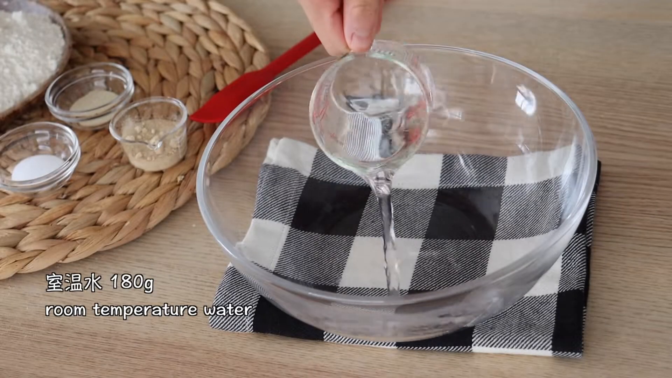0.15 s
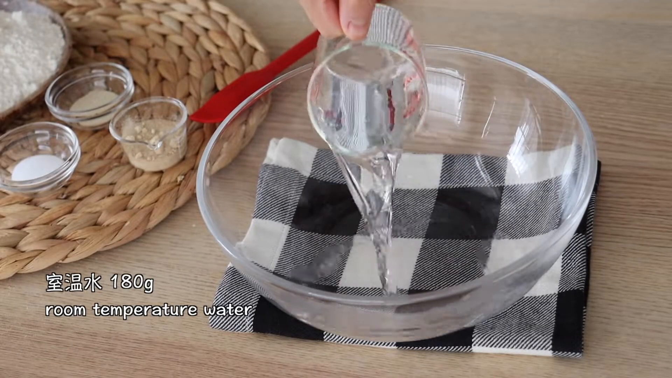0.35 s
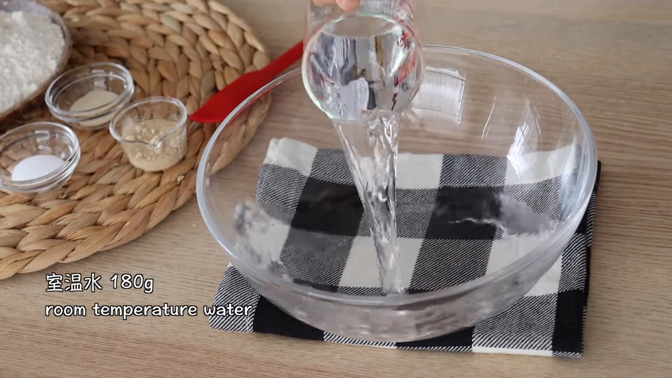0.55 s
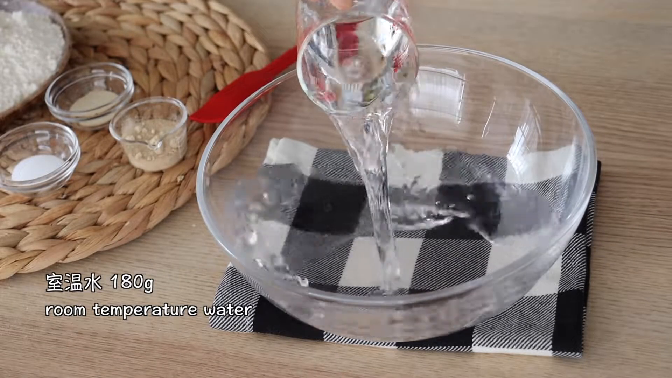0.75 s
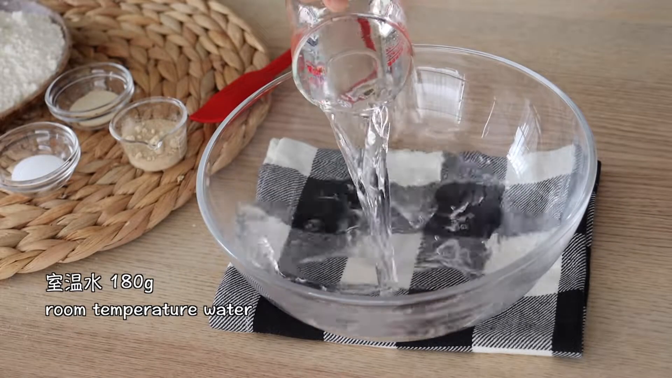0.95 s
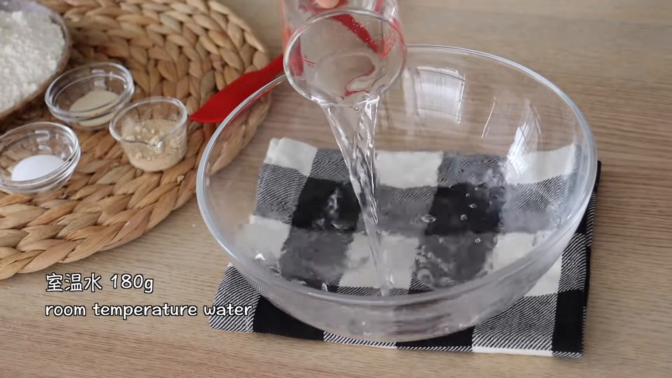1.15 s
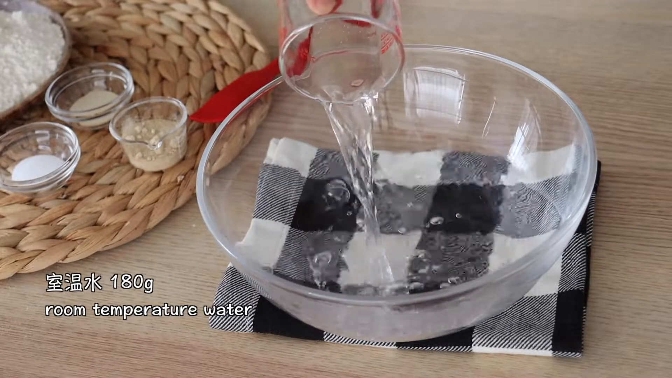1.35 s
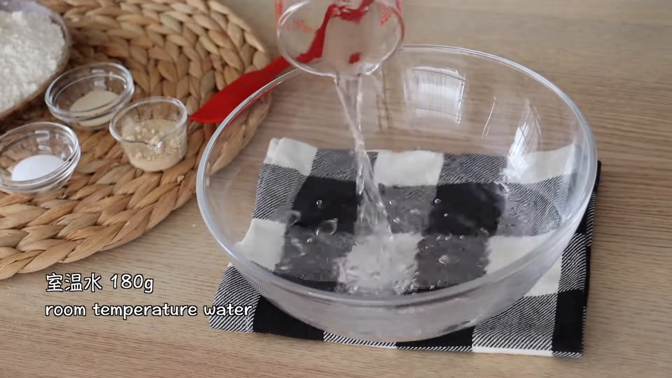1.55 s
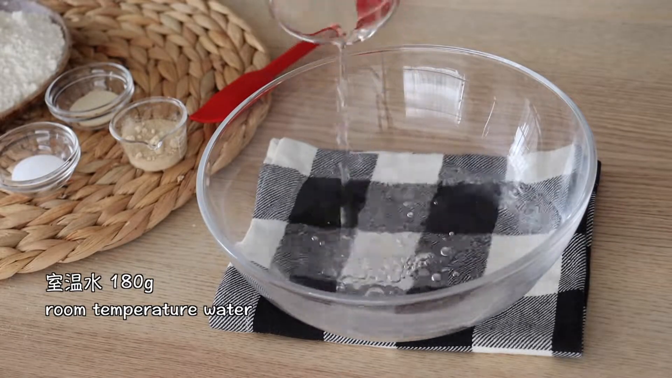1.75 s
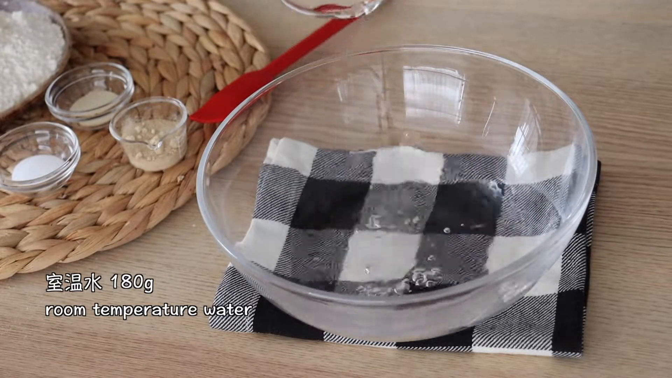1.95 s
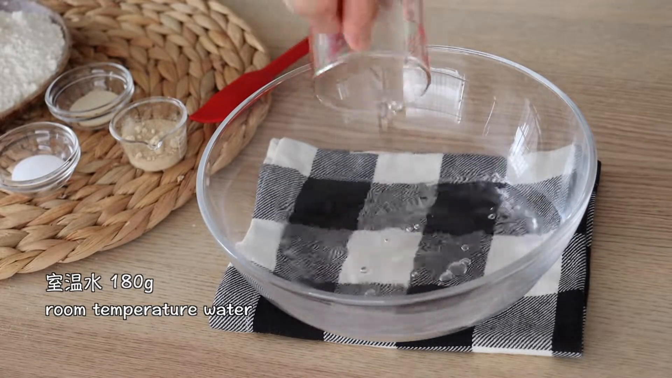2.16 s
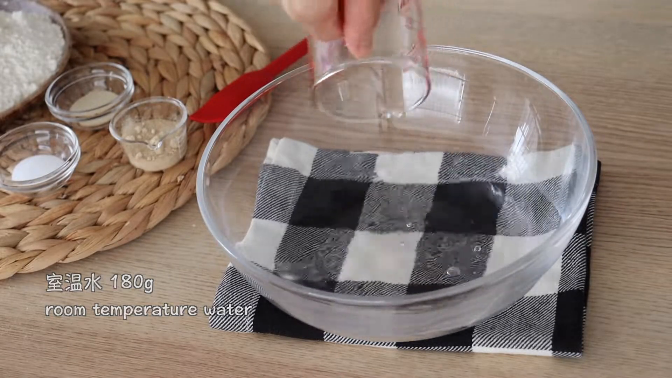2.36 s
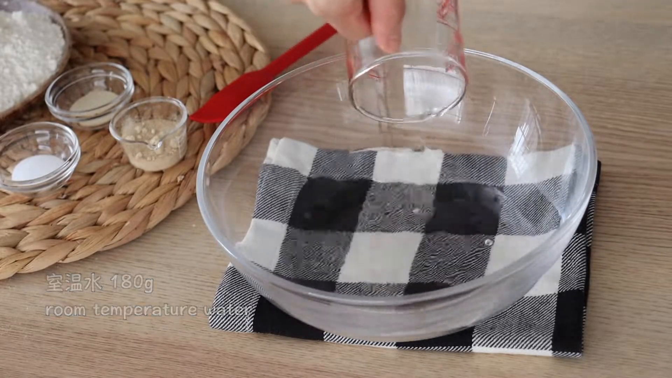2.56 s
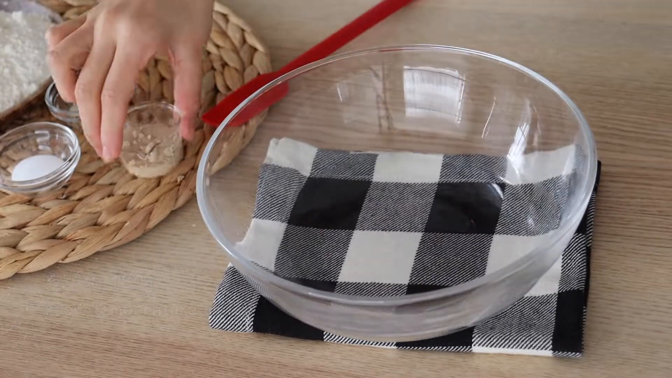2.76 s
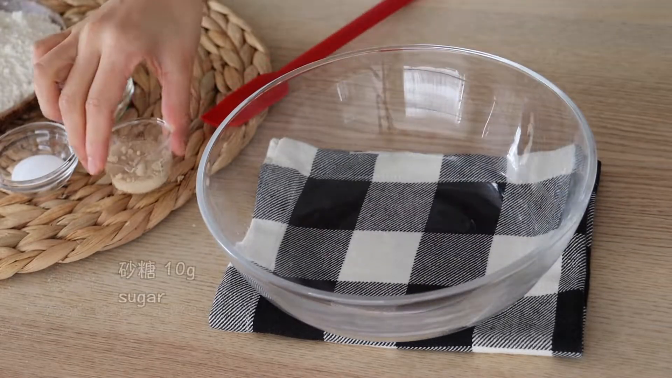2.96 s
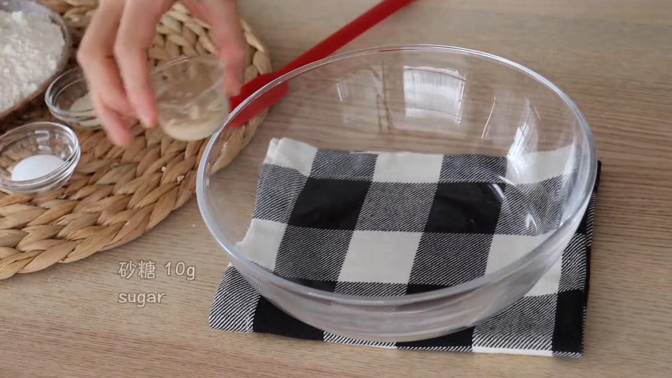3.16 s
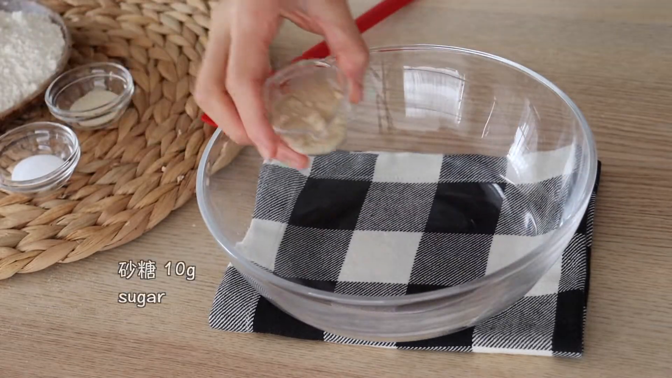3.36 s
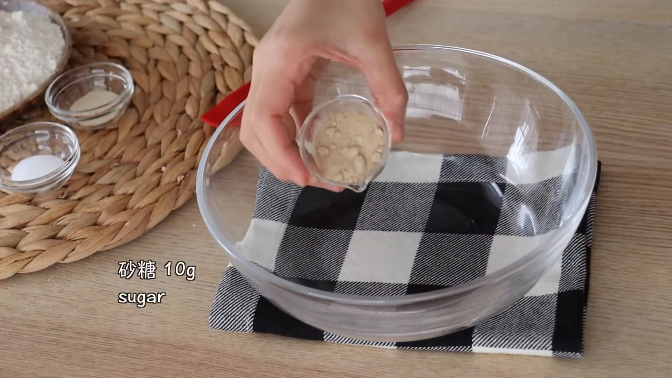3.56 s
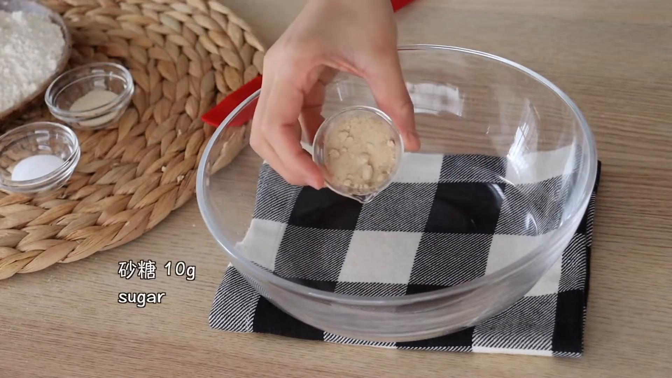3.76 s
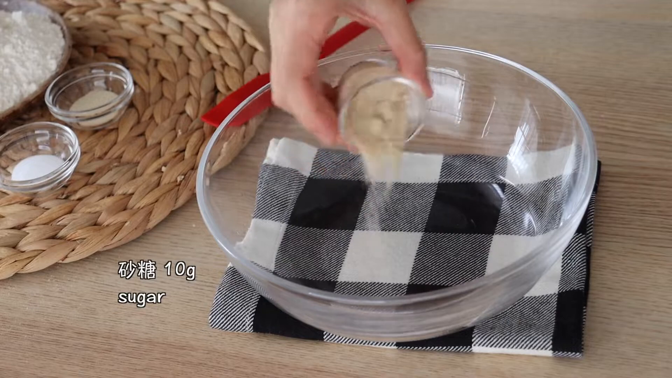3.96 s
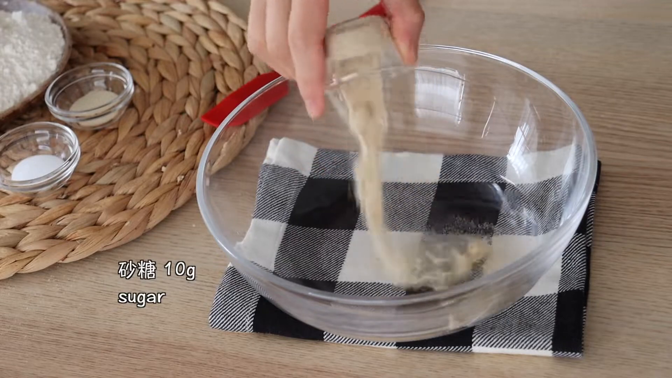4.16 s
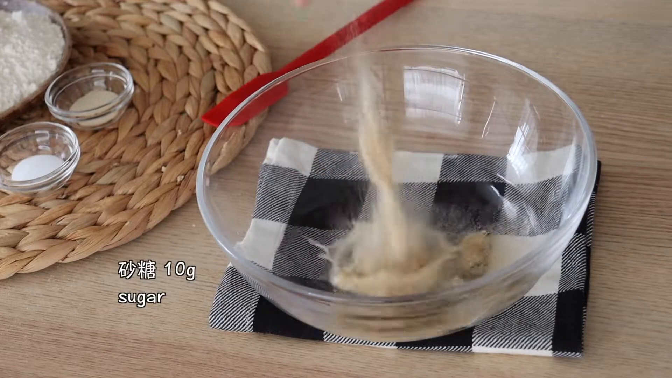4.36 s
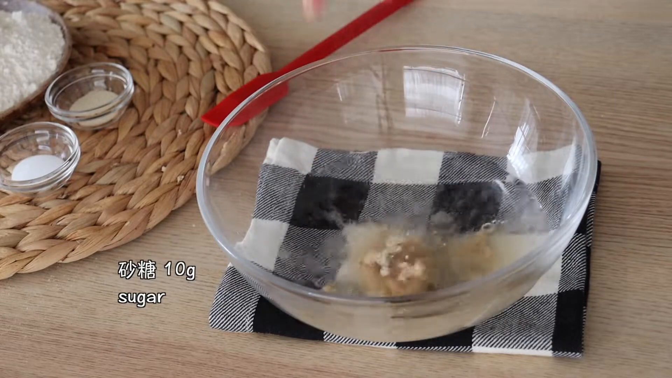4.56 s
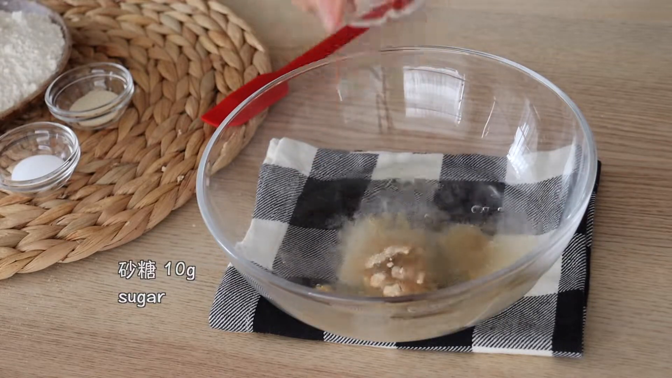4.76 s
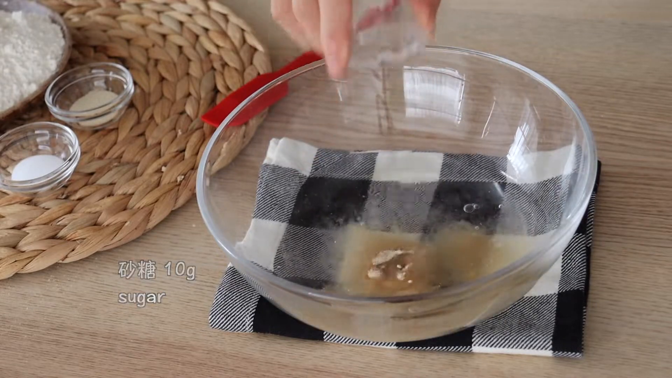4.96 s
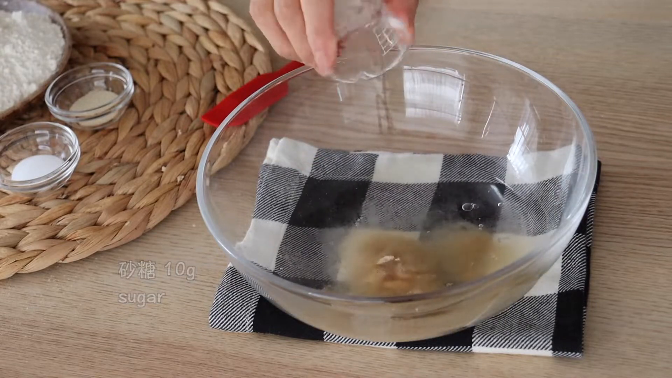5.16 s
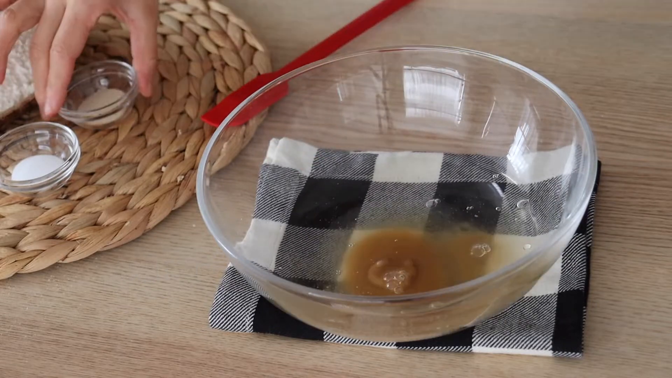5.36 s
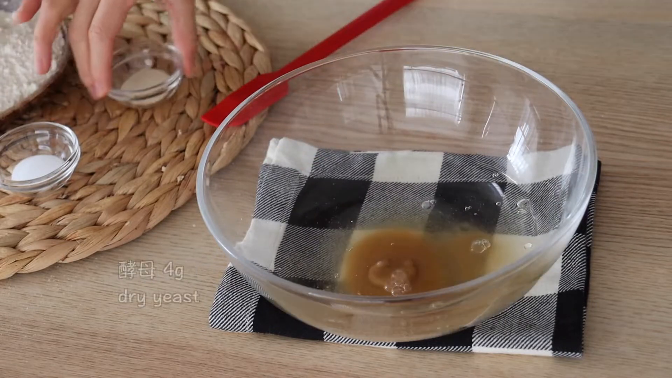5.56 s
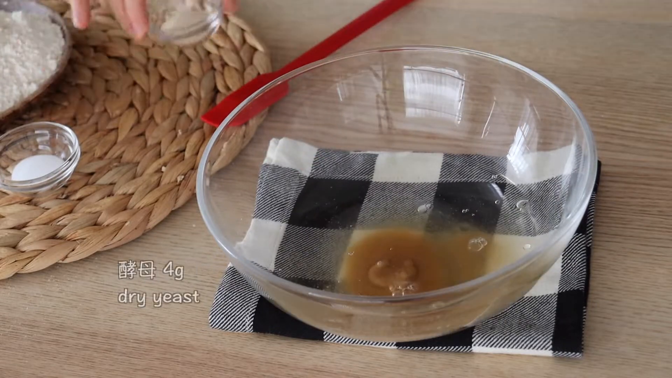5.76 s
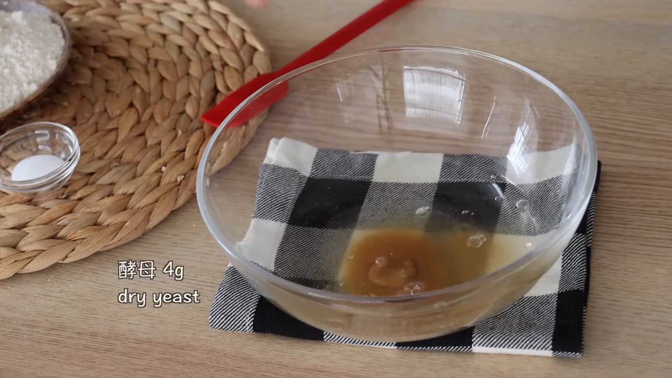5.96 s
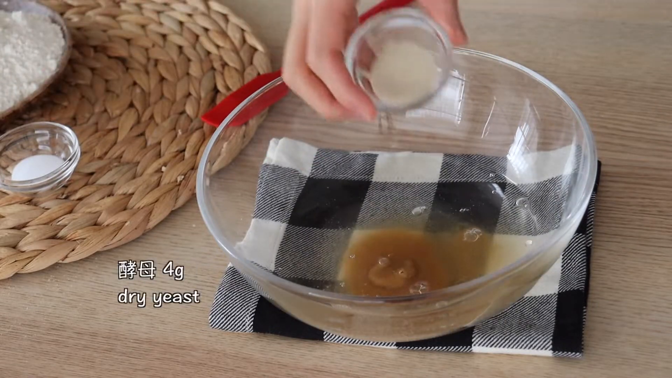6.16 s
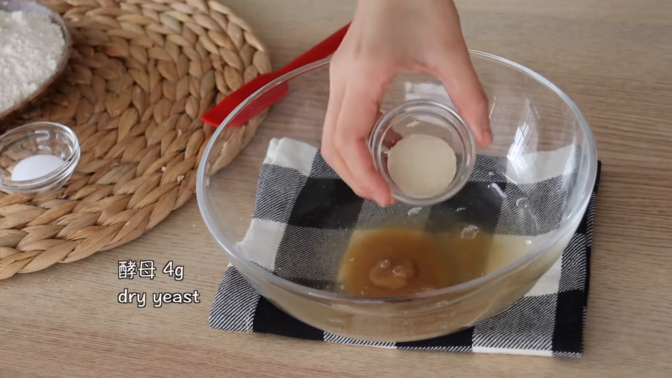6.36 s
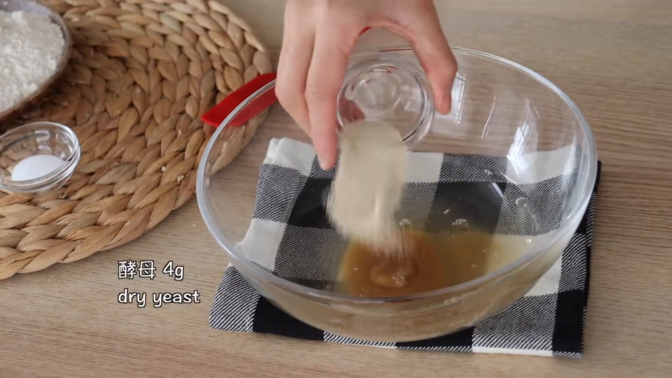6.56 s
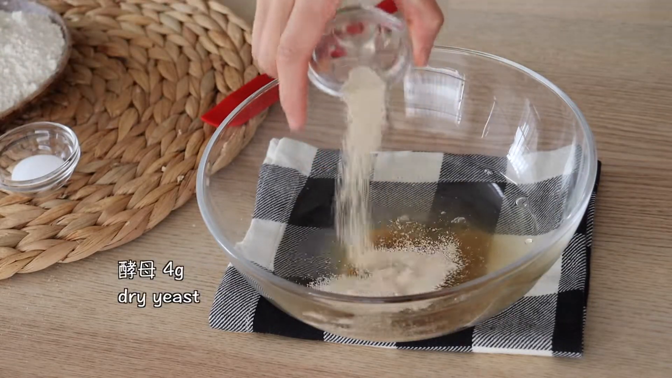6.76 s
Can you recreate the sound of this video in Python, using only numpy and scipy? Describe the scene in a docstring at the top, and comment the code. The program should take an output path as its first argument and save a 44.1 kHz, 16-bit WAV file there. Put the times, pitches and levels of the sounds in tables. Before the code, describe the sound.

In a quiet kitchen, close to the microphone and toward the left, water trickles, babbles and splashes into a glass bowl, finishing with drips and a light clink. Much softer sounds follow over a faint hum: a dish scraping on woven straw, fingers rubbing it, lumps of sugar slapping the water and dull table bumps. After a second scrape comes a tiny, hissing rush of dry yeast.

```python
"""Water pours from a cup into a wide glass bowl on a kitchen table. Trapped air rings as single plinks,
thickens to a babble with gulps and ends in drips. A small dish scuffs over a straw mat by stick-slip
friction, and a low hum joins the room noise. Lumps of sugar slap the water and the glass rings faintly;
the dish scuffs again, and last a rush of dry yeast patters in. Throughout, everything is close to the
left microphone, while the right one hears mostly the small room."""
import sys
import numpy as np
from scipy import signal
from scipy.fft import rfft, irfft
from scipy.io import wavfile

SR = 44100
rng = np.random.default_rng(int(sys.argv[2]) if len(sys.argv) > 2 else 0)


def unload_audio(sound):
    """Save the sound as a 16-bit wav file, at the path given as the first command line argument."""
    columns = np.transpose(np.atleast_2d(sound))
    # keep every value between -1 and 1, then stretch to whole-number steps
    steps = np.round(np.clip(columns, -1, 1) * 32767)
    wavfile.write(sys.argv[1], SR, steps.astype(np.int16))


N = 300321
TIME = np.arange(N) / SR
TOP_HZ = 16100


def bubble(hz, life_ms, rise, onset_cycles=0.13, swell=2.4, steady_hz=5500):
    """Minnaert resonance: trapped air pulsates, higher and louder as it nears the surface, then bursts."""
    life_samples = life_ms * SR / 1000
    age = np.arange(int(3 * life_samples) + 2) / life_samples
    rise = rise / (1 + (hz / steady_hz) ** 4)  # the tiniest bubbles hardly float up while they ring
    cycles = np.cumsum(hz * 2 ** (rise * np.minimum(age, 1) ** 2)) / SR
    onset = 1 - np.exp(-cycles / onset_cycles)
    loudness = onset * np.exp(swell * rise * (age - .5) - age ** 3)
    return np.sin(2 * np.pi * cycles) * loudness


# Bubbles that stand out singly: (time [s], pitch [Hz], level [dB], nominal rise [octaves])
PLINKS = [ (.397, 5200, -32.5, 0.22), (.415, 7900, -37, 0.58), (.451, 4700, -37, -0.048),
          (.508, 4350, -25.5, 0.0081), (.6063, 2520, -34.5, 0.41), (.611, 2260, -26.5, 0.097),
          (0.614, 7800, -33.5, 0.29), (0.658, 7600, -29, -0.033), (.7087, 1977, -19.5, 0.29),
          (.773, 10400, -36, .2), (0.783, 1057, -40, 0.1), (0.826, 4410, -15.5, -0.13),
          (.844, 1215, -15, 0.43), (0.867, 1810, -15.5, 0.27), (.885, 4480, -28, -0.11),
          (0.9125, 3060, -19, -0.096), (.921, 2940, -23.5, 0.41), (.936, 10000, -35, 0.035),
          (1.0023, 2420, -25, 0.18), (1.058, 2390, -24, -0.2), (1.076, 2450, -23, 0.35),
          (1.082, 1080, -29.5, 0.7), (1.123, 3650, -24, -0.13), (1.158, 1117, -32, 0.47),
          (1.181, 5200, -26.5, -0.14), (1.24, 4500, -30.5, 0.36), (1.275, 2240, -20.5, .07),
          (1.348, 2760, -25, 0.061), (1.361, 4030, -20.5, 0.15), (1.443, 1413, -26, -0.14),
          (1.509, 1597, -16, 0.39), (1.517, 1477, -16.5, 0.00081), (1.523, 1275, -17, 0.092),
          (1.54, 1603, -12.5, 0.063), (1.544, 1934, -21, 0.55), (1.5711, 1415, -13, -0.27),
          (1.593, 1152, -15.5, -0.088), (1.6135, 1071, -15, 0.25), (1.632, 2060, -20.5, 0.2),
          (1.676, 2310, -18.5, 0.11), (1.773, 1510, -21.5, 0), (1.773, 2020, -15.5, 0.42),
          (1.861, 1519, -11, 0.099), (1.874, 1615, -19, 0.11), (1.891, 2420, -18.5, 0),
          (1.951, 6200, -21, 0.045), (4.47, 2150, -25.5, 0.53), (4.475, 3300, -27.5, 0.42),
          (6.313, 3040, -43, 0.62)]

def plinks(ring_cycles=11.95, cycles_per_octave=13.8, tick_db=-8.5):
    """Free oscillation: a bubble pinches off with a tick, then rings, longer the further it climbs."""
    out = np.zeros(N)
    for start, hz, db, rise in PLINKS:
        life_ms = 1000 * (ring_cycles + cycles_per_octave * max(rise, 0)) / hz
        add(out, start, amp(db) * bubble(hz, life_ms, rise))
        add(out, start, amp(db + tick_db) * crack(1.75 * hz, decay_ms=0.88))
    return out


# Strength of the stream as the cup tips and empties: (time [s], level [dB])
POUR_FLOW = [(.3, -52), (.75, -27), (1.0, -13), (1.22, -12.5), (1.32, -4.5), (1.42, -3), (1.53, -6),
             (1.6, 2), (1.7, -3), (1.77, -14.5), (2.08, -28.5)]
# Spectrum of the small bubbles: (frequency [Hz], gain [dB])
BABBLE_SPECTRUM = [(400, -37), (700, -25), (1000, -26), (1350, -4), (2400, 1), (3200, -4.5), (4400, 0.5),
                   (5600, -15.5), (9000, -22), (15000, -36)]
# Spectrum of the fine spray: (frequency [Hz], gain [dB])
SPRAY_SPECTRUM = [(100, -9), (600, -3), (2000, -16), (4700, 3), (5700, 8), (6700, 12), (8000, 10),
                  (9600, 6), (11500, 11), (15500, 3)]

def stream(babble_db=-31.5, spray_db=-46, spray_exponent=0.56, slop_db=-47.5):
    """Air entrainment: the stream drags in small bubbles and throws spray; both grow with the flow."""
    flow = amp(np.interp(TIME, *np.transpose(POUR_FLOW), left=-200, right=-200))
    running = flow > amp(-100)
    babble = swarm(count=1400, low_hz=750, high_hz=7000, life_ms=5.5, spread_db=3.0, glide=0.058)
    babble = colour(babble, BABBLE_SPECTRUM)
    fizz = swarm(count=3400, low_hz=3900, high_hz=15400, life_ms=2.6, spread_db=7.5, glide=.04)
    spray = colour(fizz + amp(-4) * clicks(240, 2), SPRAY_SPECTRUM)
    last_slop = envelope(1.606, .04, attack_s=.06, release_s=0.082)  # the rest of the cup falls at once
    thrown = amp(spray_db) * flow ** spray_exponent + amp(slop_db) * last_slop
    babble = babble / np.std(babble[running]) * amp(babble_db) * flow
    return babble + spray / np.std(spray[running]) * thrown


def swarm(count, low_hz, high_hz, life_ms, spread_db, glide):
    """Superposition of random bubbles during the pour: few are loud, and small ones are damped sooner."""
    begin, end = POUR_FLOW[0][0], POUR_FLOW[-1][0]
    out = np.zeros(N)
    for when, pitch, life, rise, loud in rng.random((count, 5)):
        hz = low_hz * (high_hz / low_hz) ** pitch
        db = -spread_db * np.log(loud + 0.035)
        ring_ms = life_ms * (0.65 + life) * np.sqrt(low_hz / hz)
        add(out, begin + when * (end - begin), amp(db) * bubble(hz, ring_ms, glide * rise))
    return unit(out) * np.sqrt((end - begin) * SR / N)


# Drops and lumps hitting the water: (time [s], peak level [dB], centre [Hz], decay [ms])
SURFACE_IMPACTS = [(.613, -38, 7500, 4), (0.632, -32, 9500, 2), (.657, -36, 8000, 5),
                   (.839, -28, 10300, 3.4), (0.911, -25.5, 3420, 12), (.994, -24, 4480, 12),
                   (1.12, -23.5, 4600, 17), (1.238, -33, 2590, 1.4), (1.276, -24, 2500, 1.5),
                   (1.398, -27, 7000, 1.5), (1.5713, -12, 2550, 1.6), (1.6152, -11, 2260, 3.6),
                   (1.616, -19, 750, 5.3), (1.643, -16, 11300, 7.4), (1.687, -18.5, 10100, 1.5),
                   (1.7502, -11, 6000, .29), (1.764, -19, 8000, .7), (1.7728, -10, 3620, 3.1),
                   (1.811, -24, 7000, 2.7), (1.861, -2.5, 1980, 1.25), (1.8611, -18, 8150, .44),
                   (1.8844, -11.5, 10800, 0.5), (1.9512, -18, 7000, 1.1), (4.2028, -23.5, 1400, 2.9),
                   (4.2035, -36, 3800, 2), (4.301, -33.5, 7000, 3.9), (4.369, -30, 1170, 3.5),
                   (4.381, -41, 9000, 10)]

def slaps():
    """Impact sound: each drop or lump sends out one pressure transient as it meets the surface."""
    out = np.zeros(N)
    for start, db, hz, decay_ms in SURFACE_IMPACTS:
        add(out, start, amp(db) * crack(hz, decay_ms))
    return out


def crack(hz, decay_ms):
    """Impulsive excitation: a brief push on water gives a broad band around its centre; peak 1."""
    t = TIME[:2048]
    push = rng.standard_normal(len(t)) * np.exp(-1000 * t / decay_ms)
    push[0] += 4
    edges = [min(0.59 * hz, TOP_HZ / 2), min(2.5 * hz, TOP_HZ)]
    sound = signal.lfilter(*signal.butter(2, edges, "band", fs=SR), resonate(push, hz, 0.36 * hz))
    return sound / np.abs(sound).max()


# Resonances of the bowl's air and wall: (frequency [Hz], bandwidth [Hz], gain [dB])
BOWL_RESONANCES = [(892, 42, -1), (1080, 8.5, -24), (1200, 8.8, -28), (1318, 28, 1.5), (1644, 6.9, 0.5),
                   (1830, 50, -12), (2154, 73, -15), (2526, 13, 3), (4350, 780, -10), (9360, 360, 6.5)]

def bowl_hollow(water):
    """Forced vibration: every splash drives the air in the bowl and its wall."""
    return sum(amp(db) * resonate(water, hz, width) for hz, width, db in BOWL_RESONANCES)


# Light touches on the glass: (time [s], level [dB], favoured frequency [Hz])
GLASS_TOUCHES = [(1.9499, -18, 5900), (4.3005, -26.5, 3700), (4.379, -35.5, 3300), (4.485, -29, 12000),
                 (6.74, -49.5, 2400)]
# Modes of the glass: (frequency [Hz], level [dB], time to fade by 60 dB [s])
GLASS_MODES = [(2502, 10, 0.16), (4070, 3, 0.048), (6200, -6, 0.051), (6650, -6, 0.15), (8600, -15, .1),
               (9500, -6, 0.13)]

def clinks(reach_octaves=0.38, split=.012):
    """Modal ringing: touched glass sounds its natural frequencies; harder contact favours higher ones."""
    out, t = np.zeros(N), TIME[:SR // 2]
    for start, db, favoured_hz in GLASS_TOUCHES:
        for hz, mode_db, t60 in GLASS_MODES:
            share = 1 / (1 + (np.log2(hz / favoured_hz) / reach_octaves) ** 2)
            # the touch damps the first swing quickly and a weaker ring stays
            ring = np.exp(-t / 0.002) + 0.58 * np.exp(-np.log(1000) * t / t60)
            # glass that is not quite round splits each mode into a beating pair
            pair = 0.57 * np.sin(2 * np.pi * hz * t) + 0.073 * np.sin(2 * np.pi * hz * (1 - split) * t)
            add(out, start, amp(db + mode_db) * share * ring * pair)
    return out


# Pushes of the dish: (time [s], length [s], straw level [dB], dish level [dB], attack [s])
DISH_PUSHES = [(2.792, 0.07, -41, -46, 0.023), (2.902, .018, -42, -48, 0.023),
               (5.393, 0.038, -44, -68, 0.067), (5.46, 0.058, -41.5, -47.5, 0.016),
               (5.536, 0.047, -31.5, -29.5, 0.023), (5.612, 0.022, -34.5, -33, 0.022)]
# Spectrum of crackling straw: (frequency [Hz], gain [dB])
STRAW_SPECTRUM = [(500, -9), (900, -7.5), (1500, -5.5), (2500, -4), (4400, -6), (5700, -9), (7100, -13),
                  (9200, -8.5), (10800, -19.5), (12000, -13), (16000, -25)]

def scuffs(weave_db=3.0):
    """Stick-slip friction: the dish catches on the weave and chatters while straw fibres crackle."""
    roughness = noise([(10, -6), (50, -22), (120, -38), (500, -82)])
    weave = amp(weave_db * np.tanh(roughness))
    straw = unit(colour(clicks(1800, 0.77), STRAW_SPECTRUM) * weave)
    chatter = dish_body(clicks(900, 0.54) * weave)
    out = np.zeros(N)
    for start, length, straw_db, dish_db, attack_s in DISH_PUSHES:
        scrape = amp(straw_db) * straw + amp(dish_db) * chatter
        out += scrape * envelope(start, length, attack_s, release_s=.019)
    return out


# Fingers shifting on the dish: (time [s], length [s], level [dB])
FINGER_SHIFTS = [(3.707, .015, -42), (3.861, 0.063, -40.5), (4.686, 0.0084, -43.5)]

def fingers(rim_db=-15, rim_hz=3300):
    """Friction and light impact: fingers rub the body of the dish and tick on its rim."""
    grip = sum(amp(db) * envelope(start, length, attack_s=0.0092, release_s=0.02)
               for start, length, db in FINGER_SHIFTS)
    rim = unit(resonate(clicks(300, 2.5), rim_hz, width=500))
    return (dish_body(clicks(900, 1.9)) + amp(rim_db) * rim) * grip


# Low modes of the held dish: (frequency [Hz], nominal bandwidth [Hz], gain [dB])
DISH_MODES = [(232, 135, 6.5), (359, 79, 5.5), (500, 73, -2.5)]

def dish_body(push):
    """Damped resonance: the held dish answers a force in a few broad, low bands."""
    return unit(sum(amp(db) * resonate_twice(push, hz, 2 * width) for hz, width, db in DISH_MODES))


# Spectrum of falling grains: (frequency [Hz], gain [dB])
GRAIN_SPECTRUM = [(1500, -23), (3000, -13), (4600, -1), (7000, -10), (9500, -2.5), (15000, -15)]

def yeast(start_s=6.644, db=-39.5):
    """Shot noise: tiny dry grains strike glass and water in a rush that fades."""
    grains = unit(colour(clicks(6000, 3), GRAIN_SPECTRUM))
    return grains * amp(db) * envelope(start_s, 0, attack_s=.006, release_s=.03)


# Bumps of the table under gulps and moving hands: (time [s], length [s], level [dB], centre [Hz])
TABLE_BUMPS = [(1.59, .06, -43.5, 124), (2.806, 0.17, -44, 32), (4.335, 0.073, -34, 72),
               (4.366, 0.022, -37.5, 124), (4.577, .05, -36.5, 59.4), (4.956, 0.043, -44, 96),
               (5.787, 0.089, -40.5, 67)]

def bumps(relative_width=0.61):
    """Structure-borne sound: the table shudders, lower or higher according to where it is pushed."""
    push, out = clicks(500, 0.79), np.zeros(N)
    for start, length, db, hz in TABLE_BUMPS:
        shudder = unit(resonate_twice(push, hz, relative_width * hz))
        out += amp(db) * shudder * envelope(start, length, attack_s=0.058, release_s=0.12)
    return out


# Decay of the kitchen's echo: (frequency [Hz], reverberation time [s])
REVERB_TIMES = [(200, 0.27), (1500, 0.18), (5000, 0.23), (14000, 0.092)]

def room_tail(build_s=0.0026):
    """Reverberation: diffuse echoes of bowl, table and walls, with unit energy; the top dies first."""
    t = TIME[:SR // 2]
    spectrum, freqs = rfft(rng.standard_normal(len(t))), np.fft.rfftfreq(len(t), 1 / SR)
    tail = np.zeros(len(t))
    for hz, t60 in REVERB_TIMES:
        band = at_pitch([(other, other == hz) for other, _ in REVERB_TIMES], freqs)
        tail += irfft(spectrum * band, len(t)) * np.exp(-np.log(1000) * t / t60)
    tail *= 1 - np.exp(-(t / build_s) ** 2)
    return tail / np.sqrt(np.sum(tail ** 2))


# Spectrum of the room noise: (frequency [Hz], gain [dB])
AIR_SPECTRUM = [(20, -1.5), (36, -8), (52, -5.5), (75, -7.5), (140, -9), (215, -7.5), (319, -12),
                (500, -13.5), (759, -17.5), (1190, -21.5), (1960, -24.5), (5230, -31), (14700, -34),
                (16000, -38)]
# Further colouring of that noise on the right: (frequency [Hz], gain [dB])
RIGHT_TILT = [(30, -9), (300, -7), (2000, 0), (6000, 3), (15000, 4)]

def background(hum_start_s=3, hum_hz=69.7, hum_db=-52.5, waver_db=2, early_db=-47, late_db=-44):
    """Ambient noise: partly coherent rumble and hiss; at 3 s the background steps up and a randomly modulated
    hum comes in."""
    left, independent = noise(AIR_SPECTRUM), noise(AIR_SPECTRUM)
    right = colour(0.24 * left + 0.62 * independent, RIGHT_TILT)
    humming = TIME > hum_start_s
    air = np.array([left, right]) * amp(np.where(humming, late_db, early_db))
    waver = noise([(2, 8), (8, -36), (60, -120)])
    phase = 2 * np.pi * hum_hz * TIME + 0.18 * waver
    hum = (np.sin(phase) + amp(-13.5) * np.sin(2 * phase)) * amp(hum_db + waver_db * waver) * humming
    return air + np.array([hum, amp(-28) * hum])


def amp(db):
    """Decibels to amplitude ratio."""
    return 10 ** (np.asarray(db) / 20)


def unit(x):
    """Normalisation to rms 1."""
    return x / np.sqrt(np.mean(x ** 2))


def at_pitch(points, hz):
    """Interpolation of (frequency [Hz], value) points on a logarithmic frequency axis."""
    freqs, values = np.transpose(points)
    return np.interp(np.log(hz + 1), np.log(freqs), values)


def colour(x, points):
    """Spectral shaping by (frequency [Hz], gain [dB]) points."""
    gain = amp(at_pitch(points, np.fft.rfftfreq(len(x), 1 / SR)))
    return irfft(rfft(x) * gain, len(x))


def noise(points):
    """Gaussian noise shaped by (frequency [Hz], gain [dB]) points, rms 1."""
    return unit(colour(rng.standard_normal(N), points))


def clicks(rate, spread_db):
    """Poisson process: random impulses of uneven size at a mean rate per second, rms 1."""
    size = amp(spread_db * np.minimum(rng.exponential(size=N), 4))
    return unit((rng.random(N) < rate / SR) * size * rng.choice([-1, 1], N))


def resonate(x, hz, width):
    """Two-pole resonance with gain 1 at its centre and a bandwidth in Hz."""
    return signal.lfilter(*signal.iirpeak(min(hz, SR * .45), hz / min(width, SR * .3), fs=SR), x)


def resonate_twice(x, hz, width):
    """Two equal resonances in cascade: a narrower peak with steeper skirts."""
    return resonate(resonate(x, hz, width), hz, width)


def envelope(start, length, attack_s, release_s):
    """Linear rise until the start, a hold for the length, then exponential decay."""
    rise = np.clip(1 + (TIME - start) / attack_s, 0, 1)
    return rise * np.exp(-np.maximum(TIME - start - length, 0) / release_s)


def add(track, start, sound):
    """Superposition of a sound on a track at a time in seconds."""
    i = max(int(start * SR), 0)
    track[i:i + len(sound)] += sound[:max(N - i, 0)]


def scene(wash_db=-6, echo_left_db=-9, echo_right_db=-15.5):
    """Direct and reverberant fields: close sound dominates on the left, the room's echo on the right."""
    pour = stream()
    # the stream lands deep in the bowl, whose walls smear its grains
    wash = signal.fftconvolve(pour, room_tail()[:SR // 25])[:N]
    water = plinks() + amp(2.5) * pour + amp(wash_db) * wash + slaps()
    hollow = bowl_hollow(water)
    bowl = water + clinks()
    table = scuffs() + fingers() + bumps() + yeast()
    left = bowl + table + hollow
    right = amp(-23) * bowl + amp(-17) * table - amp(-12) * hollow
    echo = [amp(db) * signal.fftconvolve(left, room_tail())[:N] for db in (echo_left_db, echo_right_db)]
    return np.array([left, right]) + np.array(echo) + background()


def record(dry):
    """Clipping and band limiting: full scale caps the peaks and a steep low-pass cuts the top."""
    lowpass = signal.ellip(10, .2, 70, TOP_HZ, fs=SR, output="sos")
    return signal.sosfilt(lowpass, np.clip(dry, -1, 1))


dry = scene()
out = record(dry)
unload_audio(out)
```